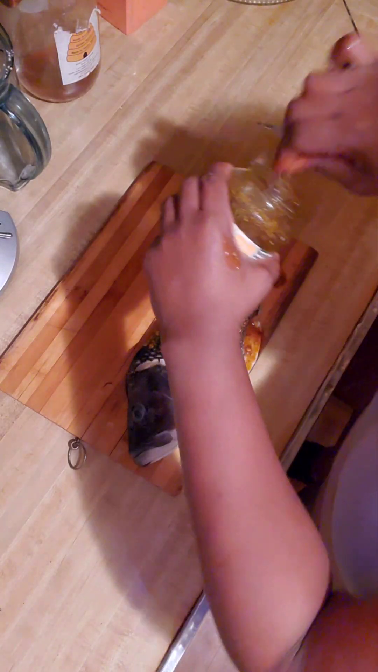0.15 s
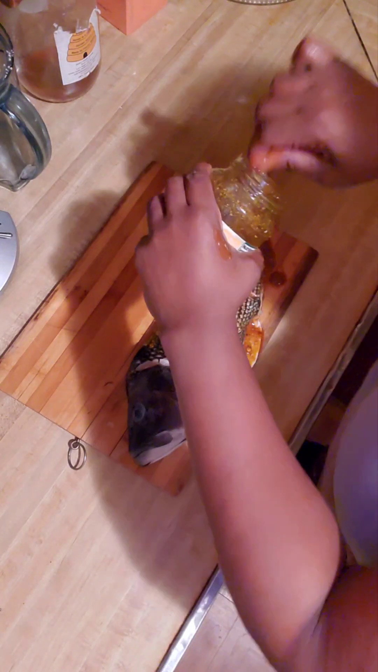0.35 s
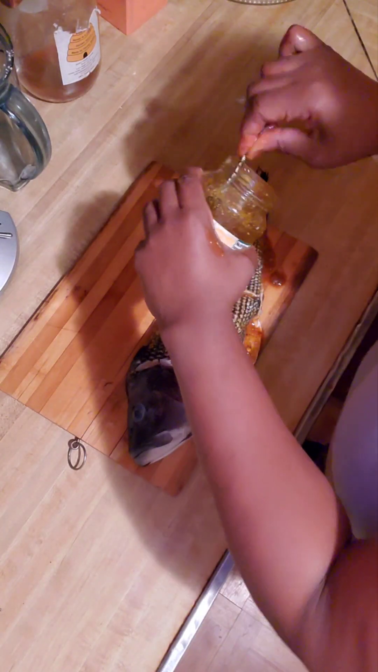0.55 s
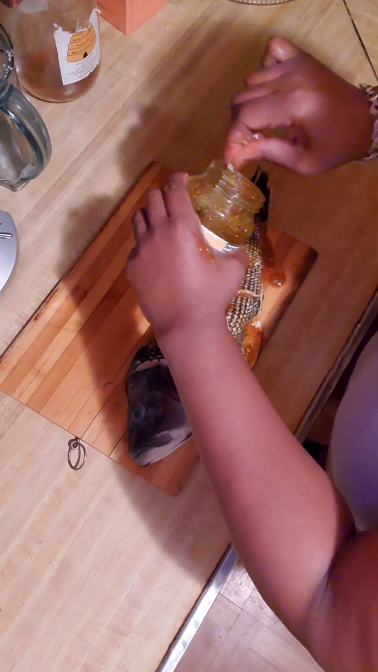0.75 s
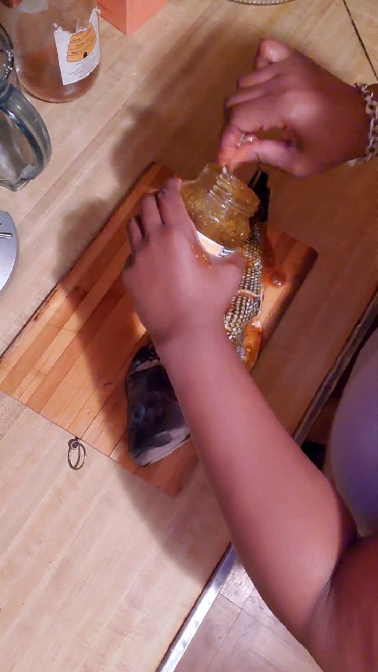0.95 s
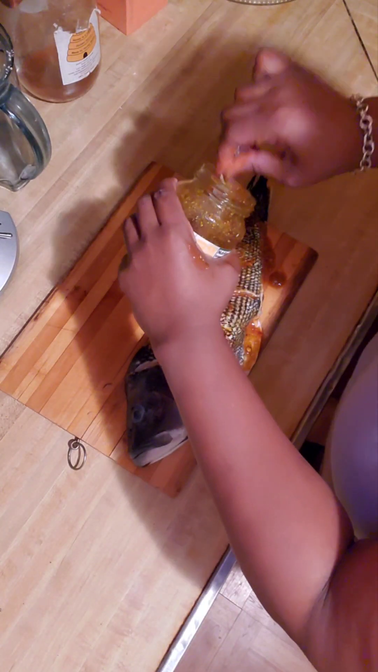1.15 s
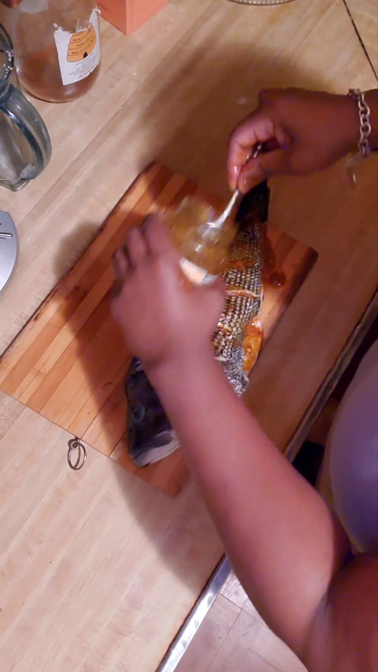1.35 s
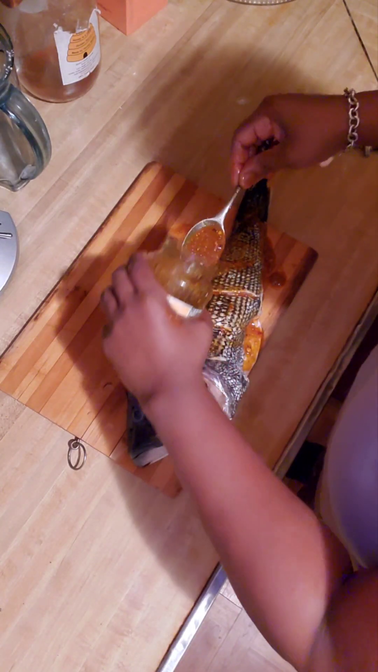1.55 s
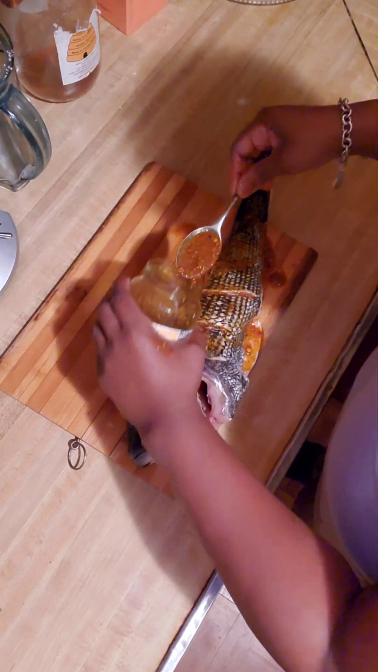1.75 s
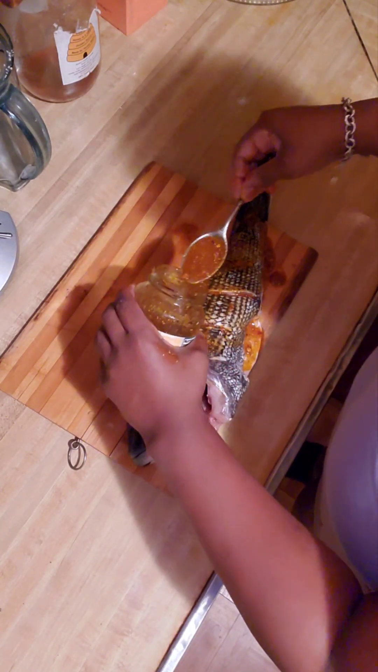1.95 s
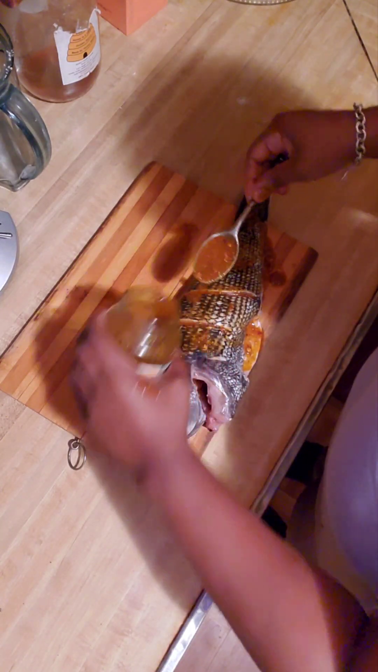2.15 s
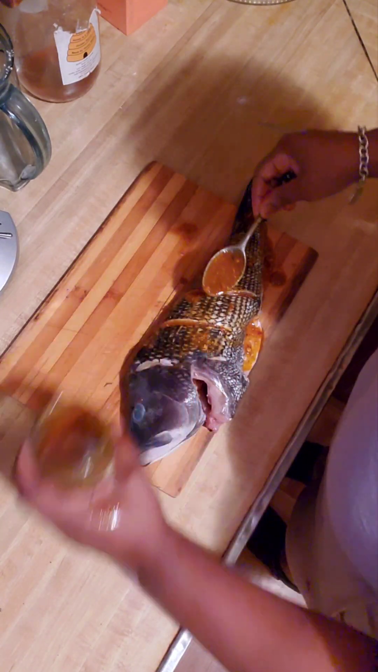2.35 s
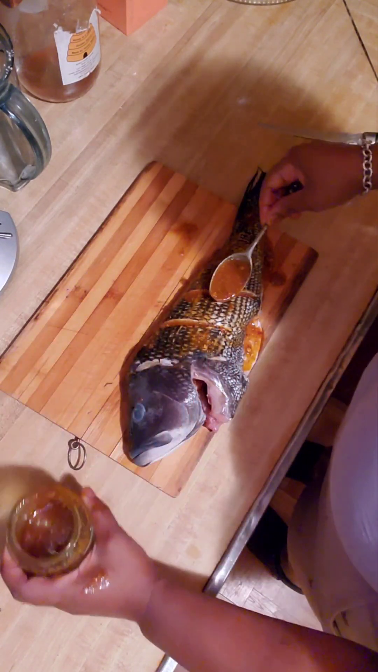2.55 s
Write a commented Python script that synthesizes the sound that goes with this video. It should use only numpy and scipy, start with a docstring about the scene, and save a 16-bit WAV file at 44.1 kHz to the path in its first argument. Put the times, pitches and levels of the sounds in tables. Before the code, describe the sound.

A metal spoon clinks inside a glass jar of paste: bright, short, high knocks from the start until 1.4 s, roughly six per second, uneven in strength, strongest near 0.4 s, some with faint hollow pops. Around 1.5-1.75 s the spoon lightly squeaks and scrapes over the rim. Very faint ticks and rustle follow until about 2.5 s, over low appliance rumble in a small, briefly echoing kitchen, miked close.

```python
"""Spoon in a glass jar

A steel spoon knocks the inside of a hand-held glass jar of paste in a small kitchen, then scrapes out
over the rim. Each knock is a bundle of fading sine tones plus a short crack of noise; the air in the jar
adds hollow pops. The scrape is many tiny slips ringing the same tones, with hiss, squeaks and a rustle.
Fading noise makes the kitchen's echo; shaped noise and wavering tones make a low appliance rumble."""
import sys
import numpy as np
from scipy import signal
from scipy.fft import rfft, irfft, next_fast_len
from scipy.io import wavfile

SR = 44100
rng = np.random.default_rng(int(sys.argv[2]) if len(sys.argv) > 2 else 0)


def int16_out(signal):
    """Quantize to a 16-bit WAV file."""
    q = np.round(np.clip(np.atleast_2d(signal).T, -1, 1) * 32767)
    wavfile.write(sys.argv[1], SR, q.astype(np.int16))


N = 114660
LEAD = SR // 5   # samples made before the start, so that sounds are already under way

# Spoon knocks on the glass, and three soft squeaks of the scrape near 1.52-1.57 s:
# (time [s], main ring [dB], main pitch [Hz], thud [dB], lower treble [dB], mid treble [dB],
# upper treble [dB], top [dB], lower treble pitch [Hz], mid treble pitch [Hz],
# time for the main ring to fall 60 dB, kept within 0.015-0.08 s when used [s])
KNOCKS = [(0.2019, -11, 3696, -29.5, -28, -25.5, -28.5, -32, 5330, 6230, 0.017),
          (0.2459, -28.5, 3710, -54, -34, -41, -42, -33, 5610, 6250, 0.022),
          (0.4086, -1.5, 3700, -21.5, -18.5, -15, -24, -22, 5350, 6710, 0.045),
          (0.5399, -15, 3708, -35, -24, -17.5, -25, -46, 5050, 6670, 0.037),
          (0.5437, -10.5, 3615, -37, -20, -18, -31.5, -29, 4860, 6860, 0.036),
          (0.6906, -15, 3680, -35, -24, -31, -38, -35, 5260, 6980, 0.043),
          (0.8746, -6.5, 3670, -24.5, -20, -15, -27.5, -20.5, 5397, 6630, 0.055),
          (1.0742, -12.5, 3700, -26.5, -22.5, -28, -28, -29.5, 5490, 6420, 0.082),
          (1.2319, -7, 3770, -23.5, -11.5, -18, -23, -17.5, 5390, 6970, 0.053),
          (1.4169, -4.5, 3608, -30, -46, -21.5, -47, -27.5, 5470, 7050, 0.063),
          (1.5209, -30, 3590, -67, -49, -40.5, -67, -56, 5270, 6690, 0.045),
          (1.5459, -27, 3610, -63, -48, -44, -42, -52, 5400, 6970, 0.086),
          (1.5718, -24, 3685, -77, -45, -39, -42, -58, 5100, 7100, 0.059),
          (1.6999, -27.5, 3620, -52.5, -48, -35.5, -58, -51, 5180, 7050, 0.043),
          (1.7329, -38, 3740, -55.5, -44.5, -42, -68, -65, 4920, 6980, 0.043),
          (1.9719, -58, 3654, -58, -75.5, -52, -55, -72, 5280, 6600, 0.044),
          (2.0579, -35, 3630, -63.5, -54, -41, -48.5, -45, 5200, 7040, 0.038)]
# A knock 50 ms before the start, of which only the tail is heard: (main ring [dB], main pitch [Hz],
# thud [dB], lower treble [dB], mid treble [dB], upper treble [dB], top [dB], lower treble pitch [Hz],
# mid treble pitch [Hz], below the limit, so the main ring takes 0.015 s to fall 60 dB [s])
EARLIER_KNOCK = (-3.5, 3689, -30.5, -16, -18.5, -24.5, -24.5, 5400, 6748, -0.66)
# Where the knock levels apply, the main ring filling two places: (frequency [Hz])
REGIONS = [2200, 3300, 4000, 5300, 6700, 8100, 11000]
# Ringing tones (modes) of jar and spoon: (pitch [Hz], level within its region [dB], time to fall 60 dB [s])
JAR_MODES = [(1159, -2.5, 0.024), (2077, 8.5, 0.0099), (2760, -8, 0.0063), (3259, -10, 0.028),
             (3683.4, -2, 0.032), (3624, -4.5, 0.045), (3960, -11.5, 0.017), (5128, -5, 0.028),
             (5370, 9.5, 0.016), (5770, 0.5, 0.011), (6230, -5.5, 0.027), (6745, 4, 0.028),
             (7000, -7, 0.011), (7930, 3, 0.018), (7930, -14, 0.024), (11670, -12, 0.023),
             (13620, -14, .006)]
# Shape of the knock's crack within the regions: (frequency [Hz], level [dB])
CRACK_COLOUR = [(200, -16.5), (500, 2.5), (1500, -0.5), (2600, -4), (3100, -5.5), (3700, -12), (4400, -18),
                (5000, -1), (8500, 6), (9400, -12.5), (11500, -9), (16000, -8)]
# Hollow pops of the air in the jar: (time [s], level before the soft start [dB], pitch [Hz])
AIR_POPS = [(0.259, -28, 619), (0.429, -35.5, 628), (0.736, -35.5, 635.6), (0.91, -29, 639),
            (1.083, -26, 616), (1.234, -31.5, 586), (1.419, -31, 575)]
# Loudness of the spoon dragging over the rim: (time [s], level [dB])
SCRAPE_LEVEL = [(1.5, -65), (1.538, -51.5), (1.552, -39.5), (1.562, -51), (1.578, -45), (1.596, -54.5),
                (1.696, -47), (1.7, -48), (1.85, -89.5)]
# How strongly the scrape rings each jar mode, in the same order: (level [dB])
SCRAPE_MODES = [-11.5, -35, -29, -3.5, -8, -5, -1.5, -17.5, -17.5, -17, -9, -13.5, -8, -22.5, -9.5, -21.5,
                -27.5]
# Colour of the scrape's hiss: (frequency [Hz], level per Hz [dB])
SCRAPE_HISS_COLOUR = [(700, -39), (1300, -19), (2300, -34.5), (3200, -12), (3900, -13), (4600, -23.5),
                      (7000, -11.5), (8400, -23), (9400, -30), (11700, -30), (16000, -37.5)]
# Faint treble rustle of hand and spoon: (time [s], level [dB])
RUSTLE_LEVEL = [(1.8, -88), (2.026, -71.5), (2.166, -71), (2.266, -71), (2.446, -76), (2.6, -81.5)]
# Colour of that rustle: (frequency [Hz], level per Hz [dB])
RUSTLE_SPECTRUM = [(1290, -43), (2200, -28.5), (2820, -7), (3530, -7), (4130, -0.5), (5090, -4), (7520, -2),
                   (10200, -43), (11500, -13), (16000, -27)]
# How long the kitchen's echo lasts: (frequency [Hz], time to fall 60 dB [s])
KITCHEN_DECAY = [(500, .3), (1200, 0.36), (2400, 0.42), (5000, 0.24), (10000, 0.51), (14000, .3)]
# Tone colour of the sound sent into the echo: (frequency [Hz], level [dB])
KITCHEN_TONE = [(500, 1), (2000, -0.5), (3700, -2.5), (6000, -0.5), (12000, 2)]
# Width of the echo: (frequency [Hz], side compared with middle [dB])
KITCHEN_WIDTH = [(500, -27.5), (2000, -38), (4000, -19.5), (8000, -18), (14000, -9)]
# Left-right balance of the jar and its echo: (frequency [Hz], left minus right [dB])
BALANCE = [(1000, -.3), (2800, -.9), (5600, .8), (10000, 1.9), (14000, -.7)]
# Colour of the background noise: (frequency [Hz], level per Hz [dB])
BACKGROUND_COLOUR = [(15, -61.5), (25, -33.5), (55, -2.5), (77, 2), (92, -18.5), (155, -10), (193, -13),
                     (226, -14.5), (338, -8), (447, -21.5), (604, -18), (642, -6), (724, -9.5),
                     (977, -25.5), (1190, -21.5), (2050, -44), (3000, -50.5), (3900, -79.5), (6600, -120)]
# Width of the background noise: (frequency [Hz], side compared with middle [dB])
BACKGROUND_WIDTH = [(40, -15.5), (80, -36.5), (180, -32), (350, -33.5), (700, -38)]
# Level of the upper background noise, which is turned down for a while; used relative to the last row:
# (time [s], level [dB])
UPPER_NOISE_LEVEL = [(0.0, -44.5), (0.16, -46), (0.38, -46), (0.51, -57), (0.74, -51), (0.9, -49.5),
                     (1.28, -49), (1.66, -50.5), (1.93, -48.5), (2.35, -47), (2.6, -47)]
# Wavering appliance tones: (pitch [Hz], width [Hz], level [dB])
APPLIANCE_TONES = [(64.15, 9.9, -54), (168.7, 9.8, -70.5), (234.8, 12, -59.5), (1575, 37, -76)]

MAIN_HZ, LOWER_HZ, MID_HZ = 3680, 5400, 6750   # usual pitches of the main ring, lower and mid treble
STRIKE_SPREAD_DB, DETUNE = 4, 0.0073   # random spread of each mode's level, and of its pitch (fraction)
CONTACT_S = 0.00085   # time constant of the knock's start when the main ring is at 0 dB
SOFTENING = 0.29      # dB of longer contact per dB of gentler blow
CRACK_DB, CRACK_T60_S = 5, 0.064   # T60 is the time to fall 60 dB
POP_T60_S, POP_RISE_S = 0.092, 0.004
SCRAPE_PER_S, SCRAPE_HISS_DB = 1600, -5   # average slips per second; hiss compared with ringing
KITCHEN_DB, KITCHEN_FADE_IN_S = -7.5, 0.0066
BACKGROUND_DB, BACKGROUND_SPLIT_HZ = -48.5, 150   # level before the upper part is turned down
HUM_STEADINESS = 0.5   # 0 noisy, 1 nearly even level
LOWPASS_HZ = 16640


def clinks():
    """Each blow rings every mode with its own strength, detuned a little at random, and adds a short crack."""
    out, t = np.zeros(N + LEAD), np.arange(SR // 5) / SR
    hz, db, t60 = (column[:, None] for column in np.transpose(JAR_MODES))
    rows = [(-1 / 20, *EARLIER_KNOCK)] + list(KNOCKS)
    others = np.arange(len(hz))[:, None] != 4   # the main mode gets no random changes
    near_main = abs(hz - MAIN_HZ) <= 130
    chance = rng.standard_normal((len(rows), 3, len(hz), 1))
    noise = rng.standard_normal((len(rows), len(t)))
    for row, (scatter, turn, shift), hiss in zip(rows, chance, noise):
        s, main_db, main_hz, thud_db, *treble, lower_hz, mid_hz, main_t60 = row
        colour = list(zip(REGIONS, [thud_db, main_db, main_db, *treble]))

        ring_t60 = np.where(near_main, np.clip(main_t60, .015, .08), t60)
        start_db = db + at_hz(colour, hz) + STRIKE_SPREAD_DB * scatter * others
        strength = from_db(start_db - 60 * t / ring_t60)

        tuning = [(MAIN_HZ, main_hz / MAIN_HZ), (LOWER_HZ, lower_hz / LOWER_HZ),
                  (MID_HZ, mid_hz / MID_HZ), (MID_HZ * 1.15, 1)]
        pitch = hz * at_hz(tuning, hz) * (1 + DETUNE * shift * others)
        glass = np.sum(strength * np.sin(2 * np.pi * pitch * t + turn * others), axis=0)

        crack_noise = coloured(coloured(hiss, CRACK_COLOUR), colour)
        crack = crack_noise * from_db(CRACK_DB - 60 * t / CRACK_T60_S)
        contact_s = CONTACT_S * from_db(-SOFTENING * main_db)
        add(out, (glass + crack) * (1 - np.exp(-t / contact_s)), s)
    return out


def pops():
    """The air in the jar is pushed and rings at its mouth pitch."""
    out, t = np.zeros(N + LEAD), np.arange(SR // 4) / SR
    for s, db, hz in AIR_POPS:
        fade = from_db(db - 60 * t / POP_T60_S)
        rise = 1 - np.exp(-t / POP_RISE_S)
        add(out, fade * rise * np.sin(2 * np.pi * hz * t), s)
    return out


def scrape():
    """Dense uneven slips ring the jar's modes, with hiss and a faint rustle alongside."""
    size = N + LEAD
    slips = (rng.random(size) < SCRAPE_PER_S / SR) * rng.standard_normal(size)
    rung = sum(from_db(db) * rms_one(ring(slips, hz, t60))
               for (hz, _, t60), db in zip(JAR_MODES, SCRAPE_MODES))
    hiss = rms_one(coloured(rng.standard_normal(size), SCRAPE_HISS_COLOUR))
    rustle = rms_one(coloured(rng.standard_normal(size), RUSTLE_SPECTRUM))
    drag = rms_one(rung) + from_db(SCRAPE_HISS_DB) * hiss
    return level(SCRAPE_LEVEL, before_db=-120) * drag + level(RUSTLE_LEVEL, before_db=-120) * rustle


def kitchen(x):
    """The room's echo is octave bands of noise, each dying at its own rate, spread over left and right."""
    t = np.arange(SR // 2) / SR
    tail = 0
    for low in 150 * 2.0 ** np.arange(7):
        octave = signal.butter(2, [low, low * 2], "band", fs=SR, output="sos")
        band = signal.sosfilt(octave, rng.standard_normal((2, len(t))))
        tail = tail + band * from_db(-60 * t / at_hz(KITCHEN_DECAY, low * np.sqrt(2)))
    tail = tail * np.clip(t / KITCHEN_FADE_IN_S, 0, 1) ** 2
    tail = tail / np.sqrt(np.sum(tail[0] ** 2))
    sent = coloured(x, KITCHEN_TONE)[None]
    mid, side = signal.fftconvolve(sent, tail, axes=1)[:, :len(x)]
    return from_db(KITCHEN_DB) * spread(mid, coloured(side, KITCHEN_WIDTH))


def room_tone():
    """Shaped noise makes a broad rumble, its upper noise turned down for a while, with wavering tones."""
    spectrum = list(BACKGROUND_COLOUR) + [(5000, -78.5)]   # the last point sets one flat level above 5000 Hz
    mid, side = coloured(rng.standard_normal((2, N + LEAD)), spectrum)
    tone = from_db(BACKGROUND_DB) * rms_one(spread(mid, coloured(side, BACKGROUND_WIDTH)))
    high_pass = signal.butter(2, BACKGROUND_SPLIT_HZ, "high", fs=SR, output="sos")
    low_pass = signal.butter(2, BACKGROUND_SPLIT_HZ, "low", fs=SR, output="sos")
    upper = signal.sosfilt(high_pass, tone)
    lower = signal.sosfilt(low_pass, tone)
    upper_gain = level(UPPER_NOISE_LEVEL) / from_db(UPPER_NOISE_LEVEL[-1][1])
    hum = sum(from_db(db) * wavering_tone(hz, width_hz) for hz, width_hz, db in APPLIANCE_TONES)
    return lower - upper * upper_gain + hum   # the minus keeps the parts from cancelling at the split


def wavering_tone(hz, width_hz):
    """Noise sent twice through a narrow resonance becomes a wavering tone; its level is partly evened."""
    t60 = 2.5 / width_hz
    x = ring(ring(rng.standard_normal(N + LEAD), hz, t60), hz, t60)
    swing = abs(signal.hilbert(x, next_fast_len(len(x))))[:len(x)]
    return rms_one(x / (swing + swing.mean() / 10) ** HUM_STEADINESS)


def ring(x, hz, t60):
    """A resonance: a single click of height 1 sets a fading sine of starting height 1 ringing."""
    r, w = from_db(-60 / (t60 * SR)), 2 * np.pi * hz / SR
    return signal.lfilter([0, np.sin(w)], [1, -2 * r * np.cos(w), r * r], x + 1e-18)


def coloured(x, spectrum):
    """Make each frequency louder or softer by a table in dB."""
    size = next_fast_len(x.shape[-1] + 4096)
    gain = from_db(at_hz(spectrum, np.fft.rfftfreq(size, 1 / SR)))
    return irfft(rfft(x, size) * gain, size)[..., :x.shape[-1]]


def spread(mid, side):
    """Left is middle plus side, right is middle minus side."""
    return mid + side * np.array([[1], [-1]])


def level(rows, before_db=None):
    """Gain over time, lead-in included, with straight lines in dB between the rows."""
    s, db = np.transpose(rows)
    return from_db(np.interp((np.arange(N + LEAD) - LEAD) / SR, s, db, left=before_db))


def at_hz(points, hz):
    """Read a table between its points, with frequency on a log scale."""
    table = np.array(points)
    return np.interp(np.log(hz + 1), np.log(table[:, 0]), table[:, 1])   # + 1 avoids log of 0


def from_db(db):
    """Turn decibels into a multiplier."""
    return 10 ** (np.asarray(db) / 20)


def rms_one(x):
    """Scale to an average strength (rms) of 1."""
    return x / np.sqrt(np.mean(x ** 2) + 1e-20)


def add(out, sound, s):
    """Mix a sound in at a time in seconds."""
    i = int(s * SR) + LEAD
    out[i:i + len(sound)] += sound[:len(out) - i]


def scene():
    """Balance the jar and its echo between left and right, add the room tone, drop the lead-in."""
    jar = clinks() + pops() + scrape()
    heard = jar + kitchen(jar)
    placed = [coloured(channel, [(hz, sign * db / 2) for hz, db in BALANCE])
              for channel, sign in zip(heard, (1, -1))]
    return (np.array(placed) + room_tone())[:, LEAD:]


def record(dry):
    """Peaks are cut flat just below full scale, then the very highest frequencies are removed."""
    low_pass = signal.cheby2(16, 80, LOWPASS_HZ, fs=SR, output="sos")
    return signal.sosfilt(low_pass, np.clip(dry, -.95, .95))


dry = scene()
out = record(dry)
int16_out(out)
```